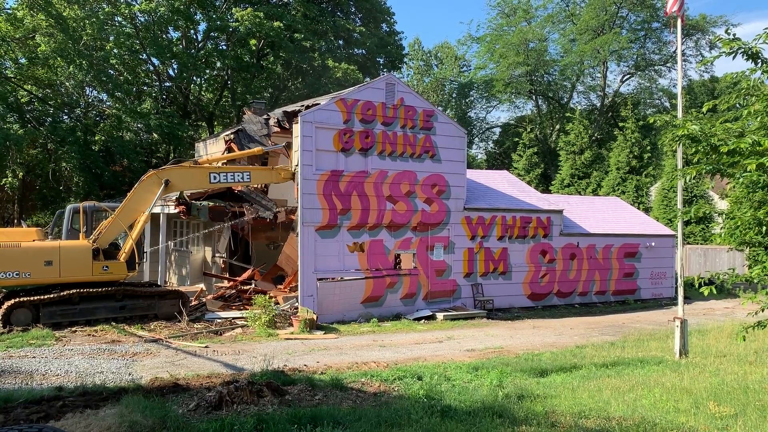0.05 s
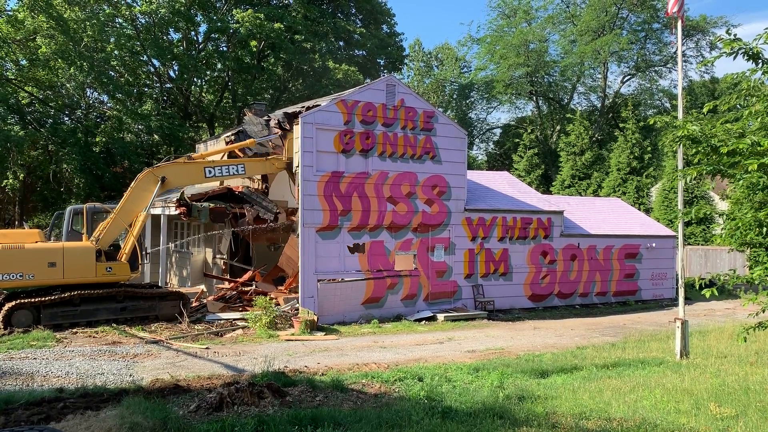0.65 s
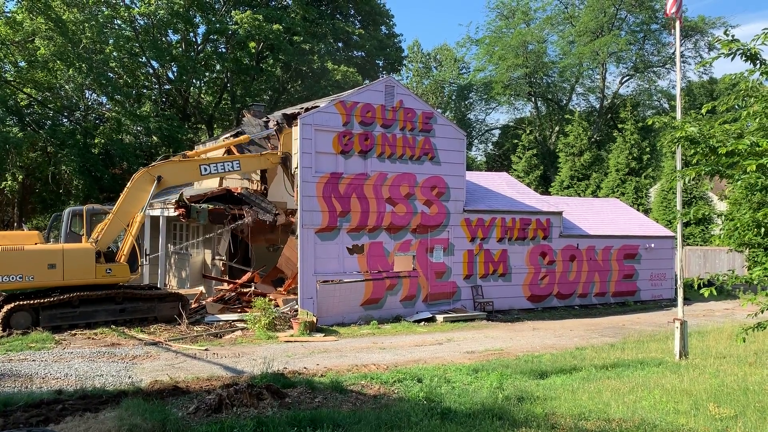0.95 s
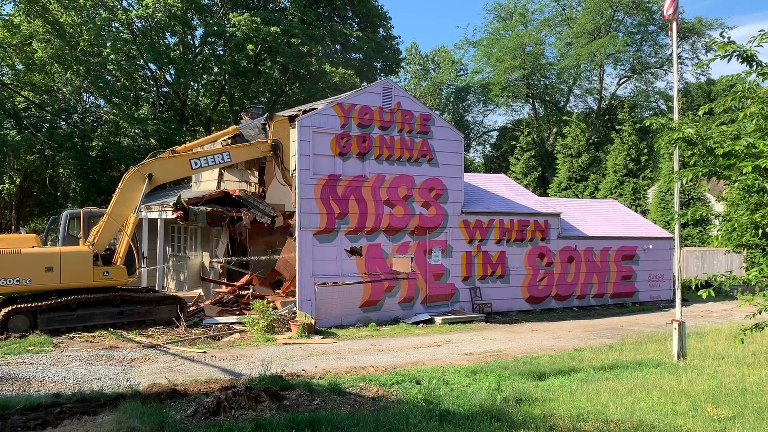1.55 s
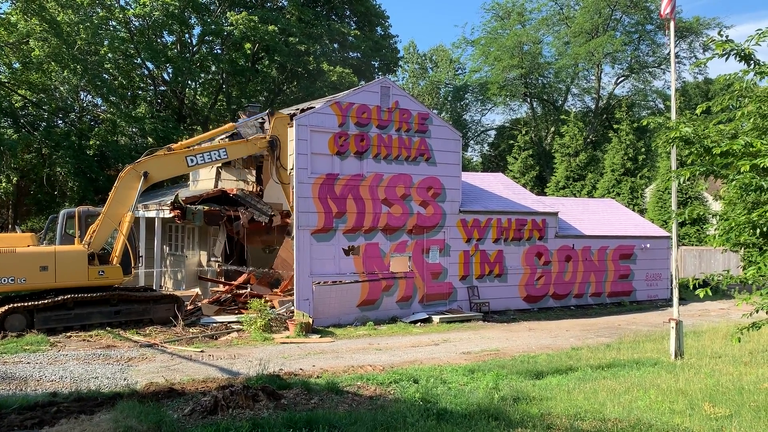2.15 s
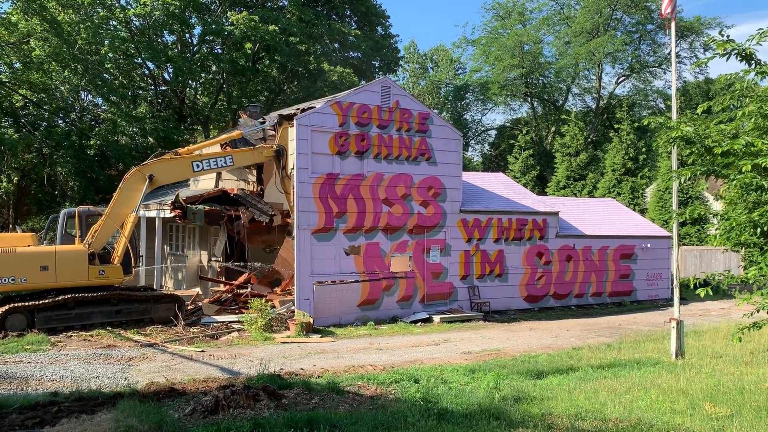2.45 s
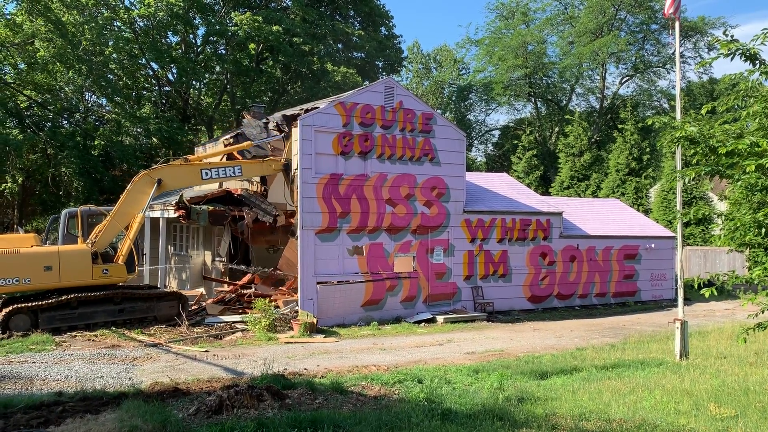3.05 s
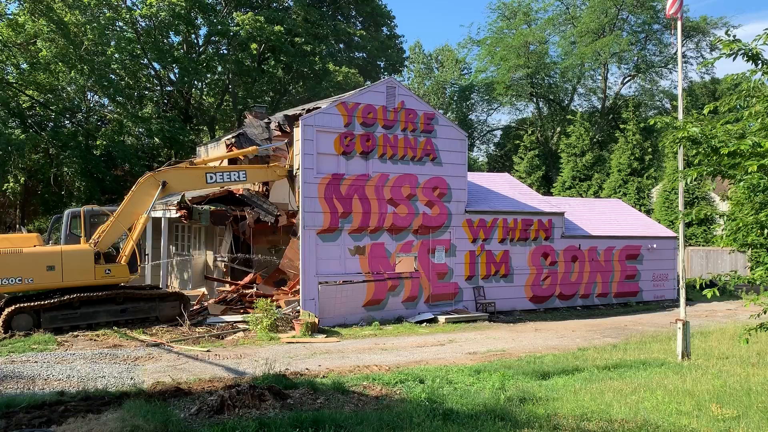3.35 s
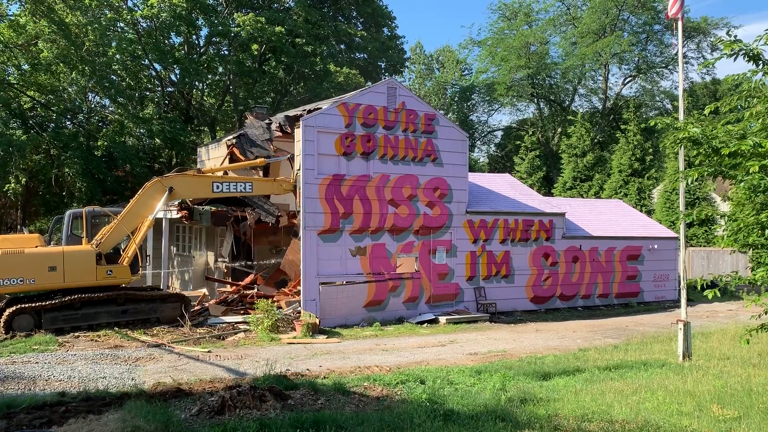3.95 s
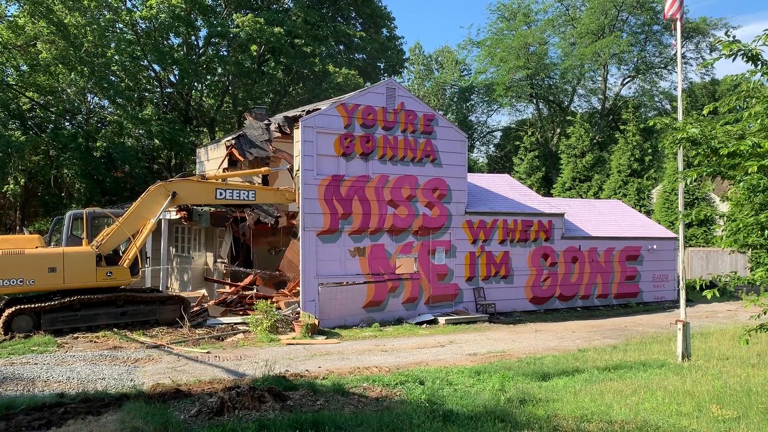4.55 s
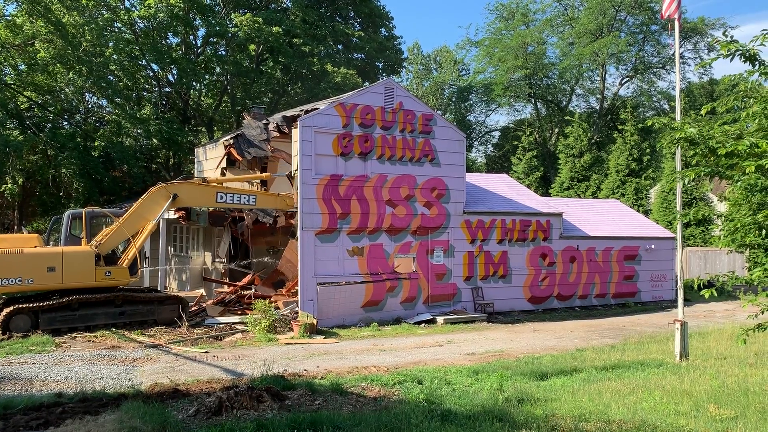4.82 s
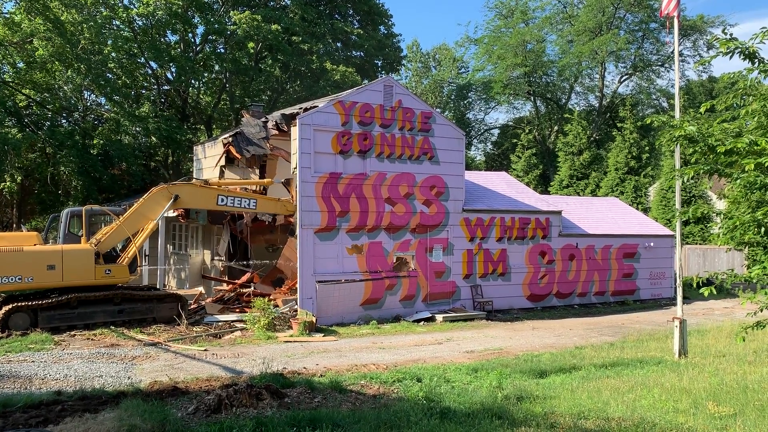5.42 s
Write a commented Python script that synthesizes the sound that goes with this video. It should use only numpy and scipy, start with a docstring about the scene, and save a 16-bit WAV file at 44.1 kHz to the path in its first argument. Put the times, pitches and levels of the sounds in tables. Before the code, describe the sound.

A diesel excavator runs steadily outdoors, some distance from the microphone, with a low drone, engine clatter and a wavering hydraulic whine. It pulls at a wooden house: after a brief nail squeak and a few knocks, boards crunch and crack in a flurry with short hisses from the hydraulics. Beams then bump dully, the walls groan low, and more timber snaps near the end.

```python
"""A diesel excavator works at governed speed some twenty metres off, pulling a wooden house apart.
Periodic firings make its exhaust drone and its block clatter; the fan hums, the hydraulic pump whines
and oil cavitates in a valve as the boom reverses. Under the bucket, timber crunches and cracks by
fracture, beams knock, and stick-slip friction makes nails squeal and walls boom.
Walls and trees scatter the sound towards two close microphones."""
import sys
import numpy as np
from scipy import signal
from scipy.fft import rfft, irfft
from scipy.io import wavfile
from scipy.ndimage import uniform_filter1d, map_coordinates

SR = 44100
rng = np.random.default_rng(int(sys.argv[2]) if len(sys.argv) > 2 else 0)


def file_out(sig):
    """Save sig as 16-bit WAV at sys.argv[1]."""
    # one column per channel
    cols = np.atleast_2d(sig).T
    # limit, then scale
    lim = np.clip(cols, -1, 1)
    pcm = np.round(lim * 32767).astype(np.int16)
    wavfile.write(sys.argv[1], SR, pcm)


N = 246078
TIME = np.arange(N) / SR
FREQS = np.arange(N // 2 + 1) * SR / N
GOVERNED_HZ, FIRINGS_PER_CYCLE = 58.64, 4  # the firing rate that the governor holds


def undb(db):
    """Amplitude ratio of a level: 20 dB to a factor of ten."""
    return 10 ** (np.asarray(db) / 20)


def unit(x):
    """Normalisation to rms 1."""
    return x / np.sqrt(np.mean(x ** 2))


def colour(x, points):
    """Spectral shaping of white sound of rms 1 to points of (frequency [Hz], density [dB per Hz])."""
    hz, db = np.transpose(points)
    octaves = np.log2(FREQS + 1)
    beyond = np.abs(octaves - np.clip(octaves, np.log2(hz[0]), np.log2(hz[-1])))
    gain = undb(np.interp(octaves, np.log2(hz), db) - 24 * beyond)  # skirts of 24 dB per octave
    return irfft(rfft(x) * gain * np.sqrt(SR / 2), N)


def resonate(x, hz, q):
    """Resonance: two second-order band-passes in cascade, with gain 1 at the centre."""
    s = 1j * np.fft.rfftfreq(len(x), 1 / SR) / hz
    return irfft(rfft(x) * (s / (s + q * (1 + s * s))) ** 2, len(x))


def walk(rate):
    """Smooth random modulation of rms 1: a spline through `rate` random values a second."""
    levels = rng.standard_normal(512)
    coarse = TIME[::64]
    eased = map_coordinates(levels, [coarse * rate], order=3, mode="grid-wrap")
    return np.interp(TIME, coarse, unit(eased))


def clicks(rate, spread_db, size=N):
    """Shot noise of rms 1: on average `rate` impulses a second, of random height and sign."""
    heights = undb(spread_db * np.minimum(rng.exponential(size=size), 4))
    return unit((rng.random(size) < rate / SR) * heights * rng.choice([-1, 1], size))


def spells(rows, edge_s):
    """Superposition of soft-edged pulses, from rows of (start [s], duration [s], height)."""
    return sum(height * (np.tanh((TIME - s) / edge_s) - np.tanh((TIME - s - length) / edge_s)) / 2
               for s, length, height in rows)


def swells(rows, edge_s):
    """Amplitude envelope, from rows of (start [s], duration [s], level [dB])."""
    return spells([(s, length, undb(db)) for s, length, db in rows], edge_s)


def gaussian(peak_s, width_s):
    """Gaussian envelope of height 1 and standard deviation width_s."""
    return np.exp(-((TIME - peak_s) / width_s) ** 2 / 2)


def tone(cycle, order, waver_db, waver_rad):
    """A harmonic phase-locked to the engine cycle, modulated by uneven firing and moving air."""
    phase = 2 * np.pi * (order * cycle + rng.random()) + waver_rad * walk(9)
    return np.sqrt(2) * np.cos(phase) * undb(waver_db * walk(6.5))


def governor(hunt_hz=2.148, settle_s=0.1787, fuel_lag_s=0.16, fuel_db_per_hz=2.5):
    """Speed follows the load as a damped oscillator; fuel is cut a moment after the load slackens."""
    # the bucket slips free (+) or digs in (-) (start [s], duration [s], firing rate shift [Hz])
    load_changes = [(0, 0.68, 0.35), (2.085, 0.6, 2.5), (2.65, .19, 1.0), (2.943, 0.27, -1.48),
                    (3.444, 0.059, -1.5), (3.954, 0.168, -1.18), (4.225, 0.085, 1.5), (4.604, 0.51, 0.33)]
    slack = spells(load_changes, edge_s=0.047)
    hunt = np.exp(-TIME / settle_s) * np.sin(2 * np.pi * hunt_hz * TIME)
    firing_hz = GOVERNED_HZ + signal.fftconvolve(slack, hunt / hunt.sum())[:N]
    late_slack = np.interp(TIME - fuel_lag_s, TIME, slack)
    return firing_hz, -fuel_db_per_hz * np.maximum(late_slack, 0)


def exhaust(cycle, fuel_db, drone_db=-16.5, lope_rad=0.098, skew_rad=0.65, rumble_db=0.5, puff=0.28):
    """Periodic puffs radiate a harmonic drone that follows the fuel, and modulate the pipe's turbulence."""
    # turbulent gas in the exhaust pipe (frequency [Hz], relative density [dB per Hz])
    pipe_spectrum = [(20, -53), (40, -67), (75, -48.5), (100, -51.5), (124, -44), (148, -49), (170, -47),
                     (200, -65.5), (250, -79.5)]
    # the drone dips briefly (time [s], half width [s], depth [dB])
    dip = (3.35, 0.022, 5.5)
    firing = 2 * np.pi * FIRINGS_PER_CYCLE * cycle
    drone = np.cos(firing + lope_rad * np.sin(2 * np.pi * cycle)) * undb(drone_db)
    for harmonic, db in ((2, -29.0), (3, -33.5)):
        phase = harmonic * firing + (harmonic - 1) ** 2 * skew_rad + 0.26 * walk(4.34)
        drone += np.cos(phase) * undb(db + 3.0 * np.tanh(walk(7)))
    dip_s, width_s, depth_db = dip
    strength = undb(fuel_db - depth_db * gaussian(dip_s, width_s))
    gas = unit(rng.standard_normal(N) * (1 + puff * np.cos(firing)))
    return np.sqrt(2) * drone * strength + undb(rumble_db) * colour(gas, pipe_spectrum)


def casing_tones(cycle, fuel_db, load_share=0.7):
    """Forced vibration: unequal cylinders drive the casing at cycle harmonics, less so on light fuel."""
    # partials of the casing (order [multiple of the cycle rate], relative level [dB])
    partials = [(9, -36.5), (14, -42.5), (20, -56.5), (23, -48), (24, -51.5), (28, -46.5), (31, -48),
                (32, -52), (35, -48), (36, -39), (39, -46), (40, -41.5), (44, -45), (45, -59.5),
                (56, -46.5), (68, -50.5), (71, -48), (73, -52), (78, -56.5), (84, -50.5), (97, -58)]
    tones = sum(undb(db) * tone(cycle, order, waver_db=2.0, waver_rad=0.38) for order, db in partials)
    return undb(load_share * fuel_db) * tones


def clatter(cycle, repeat=0.25, knock=0.091, shaft=0.062, lope=0.03, ticks=0.36):
    """Impact excitation: gears, valves, combustion and injectors shake the block and ring its panels."""
    # block, injectors and fan (frequency [Hz], relative density [dB per Hz])
    block_spectrum = [(220, -62.5), (320, -57), (430, -65.5), (590, -59), (880, -66.5), (1150, -66.5),
                      (1700, -70.5), (2300, -72), (3000, -75), (4200, -81), (5300, -83.5), (6300, -86.5),
                      (8600, -79), (12000, -89), (15200, -89.5)]
    # modes of the casing panels (frequency [Hz], quality factor, relative level [dB])
    panel_modes = [(1644, 15, -52.5), (3830, 11, -61.5), (4540, 36, -63)]
    pattern = rng.standard_normal(1000)  # gears and valves repeat with each cycle
    repeating = unit(map_coordinates(pattern, [cycle % 1 * len(pattern)], order=3, mode="grid-wrap"))
    combustion = rng.standard_normal(N) + ticks * clicks(2500, spread_db=2.5)
    turn = 2 * np.pi * cycle
    beat = 1 + knock * np.cos(FIRINGS_PER_CYCLE * turn) + shaft * np.cos(2 * turn + 1)
    beat += lope * np.cos(turn)
    force = unit((combustion + repeat * repeating) * beat * undb(0.14 * walk(11)))
    ring = sum(undb(db) * unit(resonate(force, hz, q)) for hz, q, db in panel_modes)
    return colour(force, block_spectrum) + ring


def cover_rattle(cycle, fuel_db, hz=585, q=2.95, db=-38.5, throb=0.49, uneven_db=-0.2, load_share=0.69):
    """Resonance of a loose cover, shaken once a cycle by uneven cylinders and calmer on light fuel."""
    strength = undb(uneven_db * np.tanh(walk(15)) + load_share * fuel_db)
    shakes = (1 + throb * np.cos(2 * np.pi * cycle)) * strength
    return undb(db) * unit(resonate(rng.standard_normal(N) * shakes, hz, q))


def fan(hz=759, db=-42.5, waver_db=3.0, waver_rad=1.0, flutter=0.35):
    """Blade-passing tone: a slipping coupling holds its pitch as the engine hunts; eddies modulate it."""
    phase = 2 * np.pi * hz * TIME + waver_rad * walk(15)
    return np.sqrt(2) * np.cos(phase) * undb(db + waver_db * walk(7.6)) * (1 + flutter * walk(45))


def pump(cycle, piston_order=42, gear_order=211, gear_db=-64):
    """Pressure ripple from the pistons whines in each stroke; gear meshing adds a thin, high tone."""
    # strokes of the rams load the pump (start [s], duration [s], level [dB])
    strokes = [(.72, 0.29, -37), (1.1, 1.056, -43), (2.22, 0.18, -31.5), (2.41, 0.17, -31),
               (2.62, 0.51, -38), (3.14, 0.24, -35), (3.52, 0.13, -34), (4.02, 0.15, -34.5),
               (4.5, 1.4, -39)]
    # the gears sing while they run free (start [s], duration [s], level [dB])
    gear_whines = [(2.4, 0.3, -54)]
    pistons = swells(strokes, edge_s=0.047) * tone(cycle, piston_order, waver_db=2.0, waver_rad=0.17)
    gear_gain = undb(gear_db) + swells(gear_whines, edge_s=0.04)
    return pistons + gear_gain * tone(cycle, gear_order, waver_db=1.0, waver_rad=0.35)


def crunch(rubble_db=-47, patchy_db=0.5):
    """Brittle fracture: fibres and lath snap in flurries at each bite; rubble crackles in between."""
    # crushed boards and lath (frequency [Hz], relative level [dB])
    timber_spectrum = [(200, 2), (300, 11.5), (600, 11), (1000, 2.5), (1600, 7.5), (2500, 2), (4200, -6.5),
                       (6000, -6), (8500, -23), (14000, -9.5)]
    # the bucket bites into timber (start [s], duration [s], level [dB])
    bites = [(1.0, 0.94, -51), (2.02, 0.17, -39.5), (2.275, 0.048, -39), (2.47, 0.085, -38),
             (2.69, .15, -43), (3.06, 0.52, -45), (3.58, 0.66, -41), (4.51, 0.38, -47), (4.85, 0.57, -39),
             (5.44, .25, -36)]
    snaps = unit(clicks(1800, spread_db=-0.5) * undb(patchy_db * walk(35)))
    return unit(colour(snaps, timber_spectrum)) * (undb(rubble_db) + swells(bites, edge_s=0.015))


def nails(jitter=0.021, rough_db=7.5):
    """Stick-slip friction: a drawn nail squeals roughly, reaching the left microphone first."""
    # nails leaving the wood
    # (start [s], duration [s], first pitch [Hz], last pitch [Hz], level [dB], left lead [ms])
    squeals = [(0.062, 0.048, 1750, 1690, -41, 0.02), (0.065, 0.055, 7080, 6990, -49, 0.02),
               (0.098, .07, 1760, 2060, -46, 0.02), (2.231, 0.088, 2980, 3040, -38, 0.2)]
    out = np.zeros((2, N))
    wobble = 1 + jitter * walk(260)
    grip = undb(rough_db * np.tanh(walk(120)))
    for s, length, first_hz, last_hz, db, lead_ms in squeals:
        span = (TIME >= s) & (TIME < s + length)
        drawn = (TIME[span] - s) / length
        hz = (first_hz + (last_hz - first_hz) * drawn) * wobble[span]
        lead_s = np.array([[lead_ms], [0]]) / 1000
        phase = 2 * np.pi * (np.cumsum(hz) / SR + hz * lead_s)
        out[:, span] += undb(db) * np.sin(phase) * np.sin(np.pi * drawn) * grip[span]
    return out


def house_frame(q=4.5):
    """Structural resonance: joists slip in their joints and each wall booms at its own pitch."""
    # the frame takes the strain (start [s], duration [s], frequency [Hz], level [dB])
    strains = [(.35, 0.42, 180, -34.5), (1.74, 0.46, 382, -37.5), (2.052, 0.94, 177.3, -31.5),
               (2.767, 0.28, 330, -33.5), (3.207, 1.0, 329, -38.5), (3.897, 0.3, 175.6, -34),
               (5.002, 0.7, 173.3, -28.5)]
    slips = clicks(150, spread_db=0.5)
    return sum(unit(resonate(slips, hz, q)) * swells([(s, length, db)], edge_s=0.091)
               for s, length, hz, db in strains)


def beam_knocks():
    """Heavily damped impact: rough beams bump in a chatter of contacts that dies without ringing."""
    # loose beams collide (time [s], level [dB], decay [s])
    knocks = [(0.566, -28, .01), (1.636, -26.5, 0.012), (3.582, -26.5, 0.011), (3.862, -28, 0.013),
              (3.994, -24, 0.0071), (4.057, -25, 0.019), (4.083, -24, 0.022), (4.354, -23.5, 0.013),
              (4.551, -23, .014), (4.675, -31, .012), (5.507, -29, .01), (5.557, -25, 0.0087)]
    # the dull body of a beam (frequency [Hz], relative level [dB])
    beam_spectrum = [(220, -8), (350, 1.5), (470, 0), (610, 10), (900, -11), (1600, -19)]
    blows = sum(undb(db) * (TIME >= s) * np.exp(-np.abs(TIME - s) / decay) for s, db, decay in knocks)
    contacts = unit(colour(clicks(6000, spread_db=1), beam_spectrum))
    return contacts * uniform_filter1d(blows, size=64)


def board_cracks():
    """Fracture releases strain in a fading run of snaps; thick boards resonate lower than thin lath."""
    # single boards give way (time [s], level [dB], frequency [Hz], quality factor, decay [s])
    cracks = [(1.384, -41, 4100, 4, 0.014), (1.684, -30, 1200, 2, .012), (2.04, -31, 1280, 1.4, .02),
              (2.042, -47, 3900, 1.4, .03), (2.122, -30.5, 1300, 1.2, 0.032), (2.152, -33, 2200, .9, 0.018),
              (2.192, -37, 3200, 3, 0.011), (2.525, -36, 1900, 1.2, 0.027),
              (2.562, -37.5, 3760, 1.2, 0.031), (2.585, -38, 1650, 1.4, .025),
              (2.706, -29.5, 1900, 1.1, .03), (2.736, -41, 3400, 1.5, 0.016), (2.789, -38, 3600, 1.1, .028),
              (3.314, -30.5, 1100, 1.6, .018), (3.821, -41, 2700, 2.1, .012), (3.864, -33, 1510, 1.1, .028),
              (3.916, -35, 1600, 1, .012), (4.195, -36, 2350, 5, .018), (4.3, -40, 2100, 1.4, .01),
              (4.935, -33, 1181, 1.4, 0.049), (4.96, -25.5, 2350, 2.8, .011), (5.097, -31, 2100, .9, .01),
              (5.172, -35, 1300, 1.3, .008), (5.353, -27.5, 1200, 0.99, 0.018), (5.475, -34, 2190, 2, .04),
              (5.533, -26, 1250, 1.3, .014), (5.56, -27.5, 2150, 2.7, 0.026)]
    out, size = np.zeros(N + SR), SR // 2
    for s, db, hz, q, decay in cracks:
        snaps = unit(resonate(clicks(3000, spread_db=-2.0, size=size), hz, q))
        start = int(s * SR)
        out[start:start + size] += undb(db) * snaps * np.exp(-TIME[:size] / decay)
    return out[:N]


def boom_valve():
    """Cavitation: bubbles in the valve's oil collapse in short swells of fine, dense ticks."""
    # oil squirts through the valve (peak time [s], relative level [dB], rise [s], decay [s])
    squirts = [(2.164, 0.5, 0.015, 0.029), (2.56, -0.5, 0.03, 0.16), (2.8, -5.5, 0.026, 0.059)]
    # cavitation hiss (frequency [Hz], relative density [dB per Hz])
    hiss_spectrum = [(600, -70), (1200, -61), (2500, -68.5), (4000, -80), (6000, -76.5), (8500, -70),
                     (12000, -76.5), (15000, -79)]
    swell = sum(undb(db) * np.where(TIME < s, gaussian(s, rise), np.exp(-np.abs(TIME - s) / decay))
                for s, db, rise, decay in squirts)
    return colour(clicks(8800, spread_db=2.0) * swell, hiss_spectrum)


def throttled_oil(q=2.59):
    """Orifice flow noise: oil forced through a barely open valve hisses in a narrow band."""
    # swells of throttled flow (peak time [s], half width [s], frequency [Hz], level [dB])
    throttlings = [(3.97, 0.21, 3900, -47), (4.54, 0.054, 4950, -47), (4.653, 0.079, 4300, -43),
                   (4.895, 0.087, 4400, -46)]
    flow = rng.standard_normal(N)
    return sum(unit(resonate(flow, hz, q)) * undb(db) * gaussian(s, width)
               for s, width, hz, db in throttlings)


def scatter(x, t60):
    """Diffuse reflection from walls, ground and trees; moving leaves and air modulate the phase."""
    echoes = rfft(rng.standard_normal(N) * np.exp(-np.log(1000) * TIME / t60))
    smoothed_power = uniform_filter1d(np.abs(echoes) ** 2, 200)
    response = irfft(echoes / np.sqrt(smoothed_power), N)[:SR // 2]
    spray = signal.hilbert(signal.fftconvolve(x, response)[:N])
    return np.real(spray * np.exp(2.5j * walk(14)))


def microphones(x):
    """Partial coherence: direct sound reaches the pair out of step; scattered sound differs at each."""
    # the pair (frequency [Hz], left phase lead [rad], coherence [0-1], left minus right [dB])
    pair_response = [(60, .04, .999, -1), (250, .2, .94, -.9), (600, .55, .93, .7), (1100, .4, .45, 5.8),
                     (1500, 2.1, .2, 5), (2000, 3.4, .6, .9), (3000, 3.6, .45, 1.3), (4500, 6.1, .3, 1.2),
                     (5400, 9.1, .25, -.2), (6300, 7.7, .4, -2), (7200, 6.28, .95, 0),
                     (10500, 3.14, .97, 0), (13200, 0, .93, 0), (14400, 0, .93, 0), (15600, -2, .7, 0)]
    hz, *columns = np.transpose(pair_response)
    lead, coherence, balance_db = (np.interp(FREQS, hz, column) for column in columns)
    side = np.array([[1], [-1]])
    direct = rfft(x) * np.sqrt((1 + coherence) / 2)
    diffuse = rfft(scatter(x, t60=0.3)) * np.sqrt((1 - coherence) / 2)
    return irfft((direct + side * diffuse) * np.exp(1j * side * lead / 2) * undb(side * balance_db / 2), N)


def scene(house_db=-9, casing_db=-0.8, casing_db_per_hz=0.22, casing_db_per_s=0.2342):
    """Superposition of the machine, the timber reverberating in the open rooms, and the nails."""
    firing_hz, fuel_db = governor()
    cycle = np.cumsum(firing_hz) / SR / FIRINGS_PER_CYCLE  # engine cycles elapsed
    drone = exhaust(cycle, fuel_db)
    casing = casing_tones(cycle, fuel_db) + clatter(cycle) + cover_rattle(cycle, fuel_db)
    # the casing grows louder with engine speed, and slowly as the work goes on
    effort_db = casing_db + casing_db_per_hz * (firing_hz - GOVERNED_HZ) + casing_db_per_s * TIME
    engine = drone + casing * undb(effort_db) + fan()
    hydraulics = pump(cycle) + boom_valve() + throttled_oil()
    wood = crunch() + board_cracks() + beam_knocks() + house_frame()
    rooms = undb(house_db) * scatter(wood, t60=0.48)
    return microphones(engine + hydraulics + wood + rooms) + nails()


def record(dry, top_hz=15500):
    """Band limiting: a steep elliptic low-pass removes the highest treble."""
    return signal.sosfilt(signal.ellip(10, 0.1, 80, top_hz, fs=SR, output="sos"), dry)


dry = scene()
out = record(dry)
file_out(out)
```